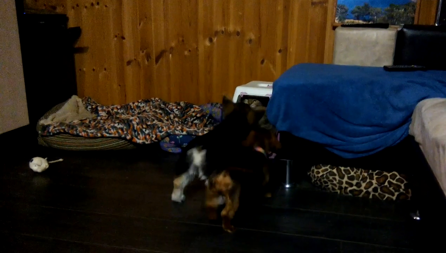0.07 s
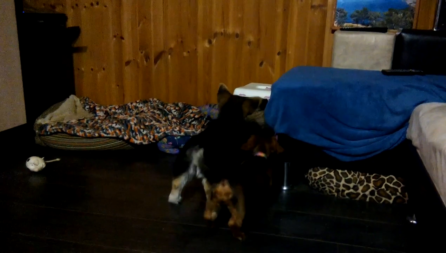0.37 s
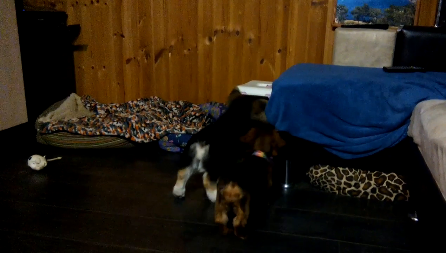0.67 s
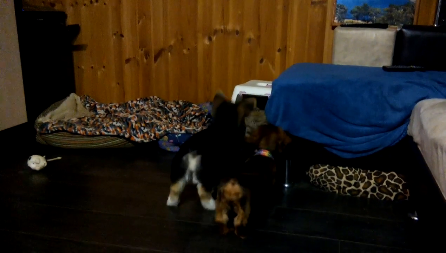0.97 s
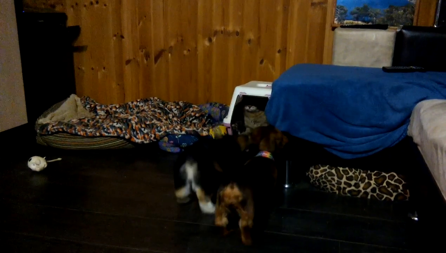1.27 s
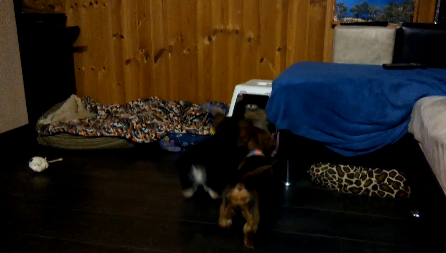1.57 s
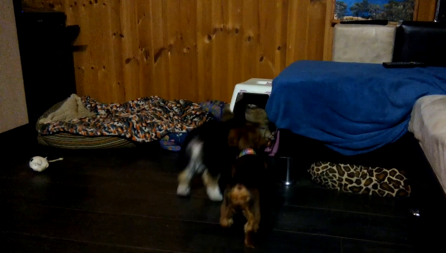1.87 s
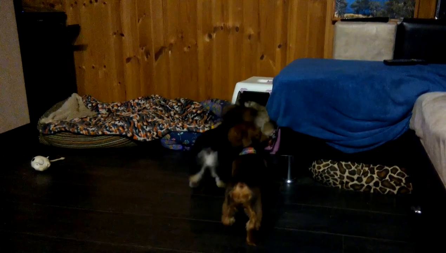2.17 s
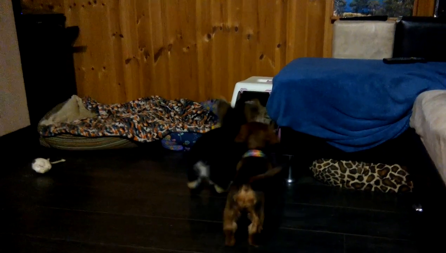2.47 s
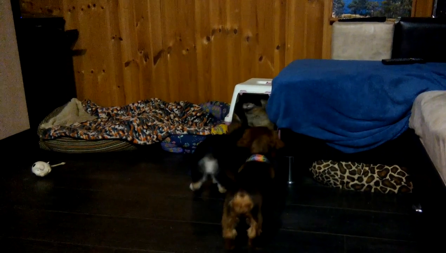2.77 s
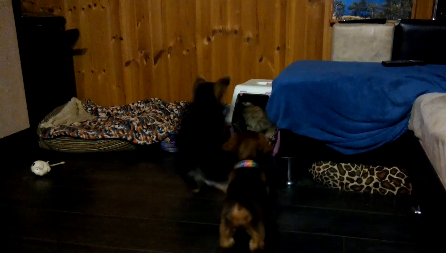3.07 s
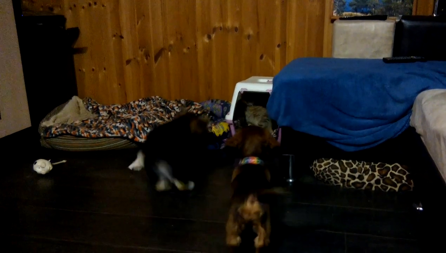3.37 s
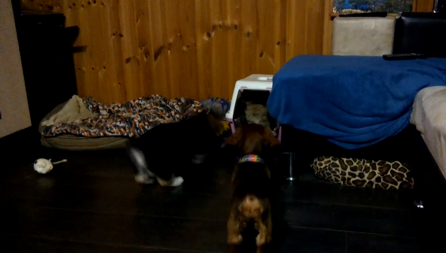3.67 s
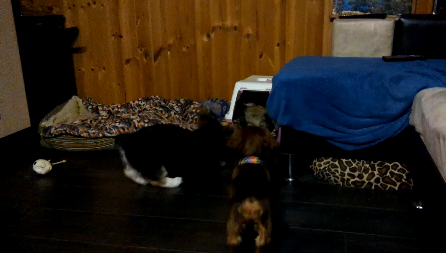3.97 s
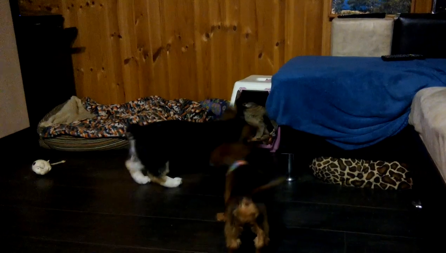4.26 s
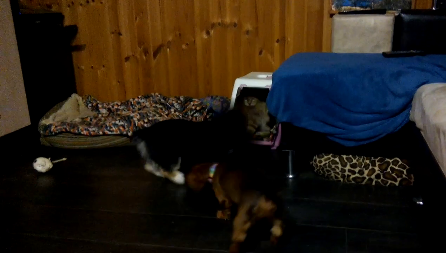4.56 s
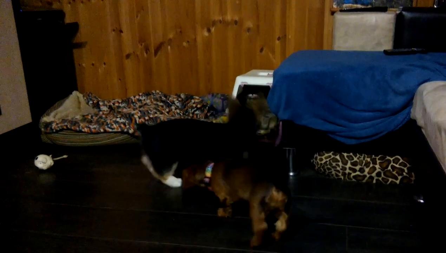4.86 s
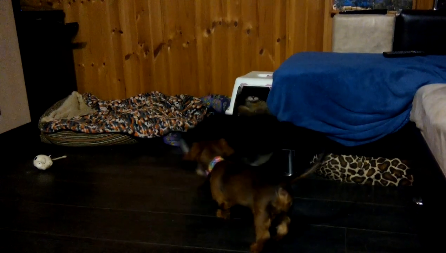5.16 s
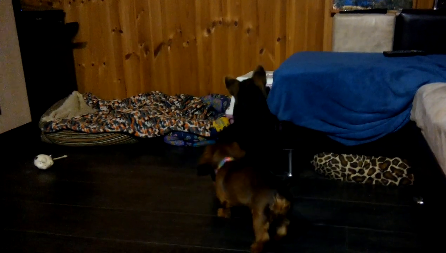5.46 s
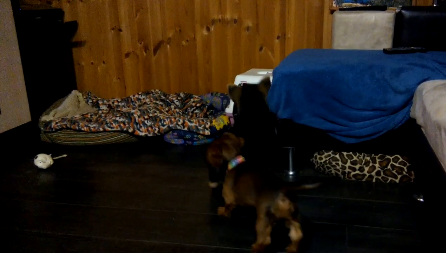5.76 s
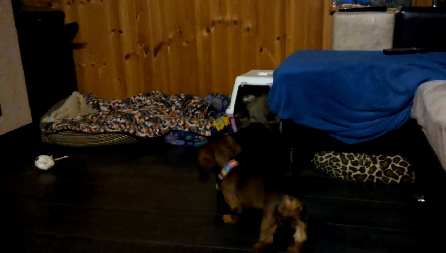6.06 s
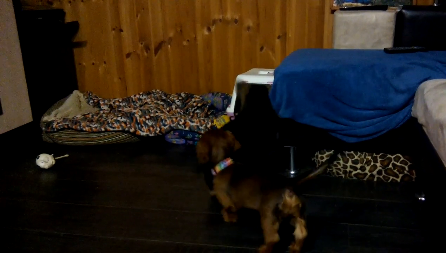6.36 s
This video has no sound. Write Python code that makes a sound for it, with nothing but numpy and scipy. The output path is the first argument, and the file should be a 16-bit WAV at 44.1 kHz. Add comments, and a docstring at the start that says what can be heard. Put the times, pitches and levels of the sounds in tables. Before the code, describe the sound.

Two small dogs scuffle on a wooden floor in a quiet, panelled room with short echoes and a faint, steady hiss and hum. For the first second and a half, there are only light, irregular claw ticks, small skids and soft paw bumps. At about 1.6 seconds one dog gives a single short, sharp, rough bark, much louder than everything else. A soft, low grunt follows at about 2.2 seconds, along with a scrape. From around 3 to 4 seconds the scuffle gets busier, with dragging paws, dull thuds on the boards, small hollow knocks and a brief high pad squeak near 3.7 seconds. Another cluster of claw clicks and thuds comes between 4.6 and 5.2 seconds. A sharper double knock with a squeak sounds at about 5.6 seconds, and a few lighter ticks and scrapes continue until about 6.5 seconds.

```python
"""One sharp, rough bark from two small dogs scuffling on a wooden floor; a soft grunt follows.
Both voices are vocal pulses and breath rasp through throat resonances. Claws tick and scrape,
pads squeak, paws thud on the boards, with short hollow knocks and soft paw bumps now and then.
The quiet, panelled room adds short echoes; faint hum and hiss lie underneath."""
import sys
import numpy as np
from scipy import signal
from scipy.fft import rfft, irfft, next_fast_len
from scipy.io import wavfile
from scipy.ndimage import uniform_filter1d, minimum_filter1d

SR = 44100
rng = np.random.default_rng(int(sys.argv[2]) if len(sys.argv) > 2 else 0)


def unload_audio(sound):
    """Save the sound as a 16-bit wav file, at the path given as the first command line argument."""
    columns = np.transpose(np.atleast_2d(sound))
    # keep every value between -1 and 1, then stretch to whole-number steps
    steps = np.round(np.clip(columns, -1, 1) * 32767)
    wavfile.write(sys.argv[1], SR, steps.astype(np.int16))


N = 286209

# bark contour (time [s], pitch [Hz], level [dB], mouth opening [0-1], roughness [0-1])
BARK_CONTOUR = [(1.554, 318.7, -42, .05, 0.5), (1.568, 287.5, -19, .33, .3), (1.585, 217.1, -13, 0.4, .3),
                (1.603, 223, -12, .62, .3), (1.622, 245.9, -12.5, .86, .4), (1.646, 261, -12.5, 1, .4),
                (1.668, 256.1, -28.5, 0.96, 0.7), (1.701, 230.6, -49, .85, .7)]
# throat modes: mouth closed, ajar, open; grunt (frequency [Hz], width [Hz], gain [dB])
CLOSED_MODES = [(313.9, 120, -5), (840, 290, 2), (2110, 400, -22)]
AJAR_MODES = [(80, 140, -25.5), (665, 190, -0.5), (870, 200, -11), (2050, 640, -14.5), (3175.5, 650, -23.5),
              (4250, 1700, -27.5)]
OPEN_MODES = [(349.7, 200, -22.5), (654, 220, -7), (787.8, 100, 1.5), (1109.9, 85, -9), (1506, 240, -2),
              (2310, 590, -13.5), (2530, 380, -9.5), (4130, 630, -6), (5580, 1100, -22.5),
              (7968.3, 1400, -25.5)]
GRUNT_MODES = [(78, 46, 5.5), (203.61, 47, -2), (371.23, 260, 1), (916.06, 270, -2)]
# overall throat colour (frequency [Hz], gain [dB])
THROAT_EQ = [(100, -5.5), (320, -0.5), (430, -9), (560, 2.5), (2700, 2.5), (3300, -3.5), (4100, 2.5),
             (4600, -6), (5200, -8), (6000, 3), (7400, -3), (10300, 2.5), (11800, -14.5), (14000, -3.5),
             (15500, -18)]
# footfalls (time [s], tick level [dB], skid level [dB])
FOOTFALLS = [(.0684, -41.5, -57), (.173, -50, -57), (.3143, -46, -54), (.7128, -39.5, -53),
             (.9928, -49, -60.5), (1.073, -41, -55), (1.423, -34, -45), (1.503, -41.5, -55),
             (1.9159, -39.5, -58), (2.022, -46, -56), (2.205, -38, -45), (3.3161, -43.5, -60.5),
             (3.4306, -27.5, -40), (3.736, -41, -47), (4.1958, -45, -59.5), (4.5606, -47, -57),
             (4.6571, -36.5, -53.5), (4.7691, -36, -44), (5.0377, -32, -41.5), (5.114, -37.5, -45.5),
             (5.364, -45.5, -59), (5.641, -37, -42.5), (6.1493, -42.5, -48.5), (6.338, -45, -54),
             (6.476, -37, -48)]
# dragged paws (time [s], length [s], level [dB])
PAW_SLIDES = [(1.01, .11, -58.5), (1.345, .08, -52), (1.8, .14, -56.5), (2.123, .062, -58),
              (2.249, .11, -42.5), (2.79, 0.18, -49.5), (3.019, .25, -52.5), (3.102, 0.18, -53),
              (3.472, .125, -44), (3.723, 0.12, -42.5), (3.82, .3, -51.5), (4.272, .078, -58.5),
              (4.69, .09, -57), (4.808, .1, -50), (5.22, .2, -61.5), (5.583, .05, -47),
              (6.209, .081, -48.5), (6.355, .09, -48)]
# pads on varnish (time [s], length [s], level [dB], pitch [Hz], width [Hz])
PAD_RUBS = [(.19, .07, -66.5, 5000, 608.6), (3.74, .05, -41.5, 4400, 904.4), (3.95, 0.3, -59, 1496, 1800),
            (4.196, .05, -57, 4200, 401.5), (4.28, .055, -61, 4221, 503.1), (5.583, .04, -43, 4200, 2500)]
# weighted landings (time [s], level [dB], boom [Hz])
LANDINGS = [(.733, -59.5, 112.6), (1.416, -51, 142.6), (2.04, -50.5, 81), (2.88, -52.5, 86),
            (3.06, -47, 185.2), (3.427, -41.5, 140.5), (3.735, -40.5, 143), (3.85, -39.5, 78),
            (4.56, -52.5, 161), (4.779, -47.5, 82.47), (4.832, -45, 127), (5.045, -44, 158.7),
            (5.119, -45, 86), (5.372, -50, 81), (5.644, -42.5, 123), (6.401, -55, 176.4)]
# short hollow knocks and soft paw bumps (time [s], level [dB], ring [Hz], length [s])
HOLLOW_KNOCKS = [(.255, -63.5, 697.7, .015), (1.33, -54, 830, .014), (2.844, -54, 640, .012),
                 (3.06, -51, 288, .02), (3.142, -58, 800, .02), (3.845, -54, 560, 0.0276),
                 (4.11, -57.5, 517, .018), (5.108, -53.5, 792, .04), (5.581, -36, 2300, .022),
                 (5.588, -46.5, 320, 0.017), (5.605, -40.5, 2295, .02), (6.152, -56.5, 446.1, 0.028)]
# claw, pad and body weight on wood (frequency [Hz], gain [dB])
CLAW_EQ = [(240, -41), (400, -17.5), (605, -10.5), (928, -12), (1000, -14.5), (1380, -19.5), (1910, -9.5),
           (2250, -11), (2430, -7.5), (2880, -9), (3740, -4), (4490, -1), (7210, -6.5), (14400, -37.5),
           (15500, -32)]
PAD_EQ = [(40, -28), (110, 9), (200, 4.5), (400, -4), (650, -2), (1000, -4.5), (1400, -14), (3000, -23.5),
          (9000, -50.5)]
THUD_EQ = [(20, -5.5), (45, -10.5), (80, 3), (170, -6.5), (260, -16.5), (500, -40), (1500, -77.5)]
# hiss spectrum (frequency [Hz], gain [dB])
HISS_EQ = [(20, -21.5), (60, -12), (100, -1), (140, -12), (185, -7), (260, -12.5), (600, -17), (2500, -22),
           (4800, -19.5), (7700, -23.5), (12000, -25), (15600, -28)]
# room decay (frequency [Hz], T60 [s])
ROOM_T60 = [(80, 0.4), (400, 0.3), (800, 0.33), (2000, .36), (4200, 0.3), (7000, .36), (14000, .26)]


def bark(jitter=.05, shimmer_db=3.5, gain_db=-2.4):
    """Uneven vocal pulses and rasp through a throat that brightens as the jaw drops."""
    times, *columns = np.transpose(BARK_CONTOUR)
    t = times[0] + clock(times[-1] - times[0])
    pitch_hz, db, mouth, rough = [np.interp(t, times, column) for column in columns]
    cycle = np.cumsum(pitch_hz / SR).astype(int)
    pitch_error, level_error = rng.standard_normal((cycle[-1] + 1, 2))[cycle].T
    phase = np.cumsum(pitch_hz * (1 + jitter * pitch_error) / SR)
    pulses = unit(np.diff(np.floor(phase), prepend=-1) * amp(shimmer_db * level_error))
    rasp = unit(rng.standard_normal(len(t)) * np.exp(-2.2 * (phase % 1)))  # one air burst per cycle
    source = amp(db + gain_db) * (np.sqrt(1 - rough) * pulses + np.sqrt(rough) * rasp)
    voice = 0
    for k, modes in enumerate([CLOSED_MODES, AJAR_MODES, OPEN_MODES]):
        crossfade = np.sin(np.pi / 2 * np.maximum(1 - np.abs(2 * mouth - k), 0))
        voice += coloured(source * crossfade, lambda f: amp(along(THROAT_EQ, f)) * formants(f, modes))
    track = np.zeros(N)
    add(track, times[0], in_room(voice, wet_db=1))
    return track


def grunt(start_s=2.218, length_s=.074, pitch_hz=118, rasp_db=4, gain_db=-39):
    """A few slow vocal pulses and rasp behind a shut mouth."""
    t = clock(length_s)
    pulses = unit(np.diff(np.floor(pitch_hz * t), prepend=0))
    swell = np.sin(np.pi * (t / t[-1]) ** 1.3) ** 2
    source = unit(swell * (pulses + amp(rasp_db) * rng.standard_normal(len(t))))
    voice = coloured(source, lambda f: formants(f, GRUNT_MODES))
    track = np.zeros(N)
    add(track, start_s, amp(gain_db) * in_room(voice, wet_db=-2))
    return track


def steps(pad_lead_s=.004, pad_db=-12.5, skid_lag_s=.002, skid_s=.048, skid_db=-1.6):
    """Each footfall: pad pats, claws tick, foot skids. Harder skids are brighter."""
    track = np.zeros(N)
    for at_s, tick_db, db in FOOTFALLS:
        tilt_db_per_oct = 3 + .41 * (db + 50)  # -50 dB: a middling skid
        add(track, at_s, amp(tick_db) * in_room(claw_tick(), wet_db=-2))
        add(track, at_s - pad_lead_s, amp(db + pad_db) * pad_pat())
        add(track, at_s + skid_lag_s, amp(db + skid_db) * claw_scrape(skid_s, tilt_db_per_oct))
    return track


def claw_tick(centre_hz=5000, spread_oct=.19, width_hz=1000, attack_s=.0003, t60_s=.016, second_db=-2):
    """A claw strikes wood and rings briefly; its neighbour lands just after."""
    t = clock(.03)
    ring_hz = centre_hz * 2 ** (spread_oct * rng.standard_normal())
    lag_s = rng.uniform(.0014, .0044)
    touch = lambda age_s: (1 - np.exp(-age_s / attack_s)) * amp(-60 * age_s / t60_s)
    envelope = touch(t) + amp(second_db) * touch(np.maximum(t - lag_s, 0))
    contact = envelope * rng.standard_normal(len(t))
    return coloured(contact, lambda f: amp(along(CLAW_EQ, f)) * (.24 + resonance(f, ring_hz, width_hz)))


def claw_scrape(length_s, tilt_db_per_oct):
    """Claws drag over the grain; sharper slips sound brighter."""
    gain = lambda f: amp(along(CLAW_EQ, f) + tilt_db_per_oct * np.log2(np.maximum(f, 1500) / 5000))
    slips = stroke(length_s, grain_db=4.5, skew=.7)
    return in_room(coloured(slips, gain), wet_db=-.5)


def pad_pat():
    """A soft pad meets wood."""
    contact = stroke(.021, grain_db=4, skew=.98)
    return in_room(coloured(contact, lambda f: amp(along(PAD_EQ, f))), wet_db=.5)


def slides(gain_db=-2):
    """Shoving dogs drag their feet: longer, duller scrapes."""
    track = np.zeros(N)
    for at_s, length_s, db in PAW_SLIDES:
        add(track, at_s, amp(db + gain_db) * claw_scrape(length_s, tilt_db_per_oct=.52))
    return track


def pad_squeaks(gain_db=-2):
    """Pads stick and slip on varnish: band-limited noise."""
    track = np.zeros(N)
    for at_s, length_s, db, hz, width_hz in PAD_RUBS:
        slips = stroke(length_s, grain_db=1, skew=.93)
        squeak = coloured(slips, lambda f: resonance(f, hz, width_hz) ** 2)
        add(track, at_s, amp(db + gain_db) * in_room(squeak, wet_db=-1))
    return track


def paw_thuds(boom_s=.19, boom_db=-5.5, joist_hz=82, joist_db=-5, thud_db=-11):
    """A landing paw slaps and thuds; the floor booms at the impact and on its joists."""
    track, t = np.zeros(N), clock(boom_s)
    swell = np.sin(np.pi * (t / t[-1]) ** .52) ** 2
    for at_s, db, hz in LANDINGS:
        boom = swell * (np.sin(2 * np.pi * hz * t) + amp(joist_db) * np.cos(2 * np.pi * joist_hz * t))
        thud = coloured(stroke(.073, grain_db=1, skew=.6), lambda f: amp(along(THUD_EQ, f)))
        slap_db = -16 + 4.5 * np.log2(hz / joist_hz)  # quick landings boom higher, slap more
        add(track, at_s, amp(db + boom_db) * boom)
        add(track, at_s, amp(db + thud_db) * in_room(thud, wet_db=-3.5))
        add(track, at_s, amp(db + slap_db) * pad_pat())
    return track


def knocks(damping=.52, gain_db=-2):
    """Hollow knocks and soft paw bumps: brief contact noise through one broad resonance."""
    track = np.zeros(N)
    for at_s, db, hz, length_s in HOLLOW_KNOCKS:
        contact = stroke(length_s, grain_db=1.5, skew=.79)
        knock = coloured(contact, lambda f: resonance(f, hz, damping * hz) ** 2)
        add(track, at_s, amp(db + gain_db) * in_room(knock, wet_db=-2.5))
    return track


def stray_claws(rate_per_s=4, softest_db=-56.5, range_db=6):
    """Light random claw touches as the dogs shift weight."""
    track, count = np.zeros(N), round(rate_per_s * N / SR)
    for when, force in rng.random((count, 2)):
        add(track, when * N / SR, amp(softest_db + range_db * force) * in_room(claw_tick(), wet_db=-1))
    return track


def background(hiss_db=-65, hum_db=-78, hum_hz=101.08, drift_hz=1.5, drift_rad=.4):
    """Even hiss and a faint, wavering electrical hum."""
    hiss = unit(coloured(rng.standard_normal(N), lambda f: amp(along(HISS_EQ, f)))[:N])
    drift = unit(coloured(rng.standard_normal(N), lambda f: 1 / (1 + (f / drift_hz) ** 4))[:N])
    hum = unit(np.sin(2 * np.pi * hum_hz * np.arange(N) / SR + drift_rad * drift))
    return amp(hiss_db) * hiss + amp(hum_db) * hum


def in_room(x, wet_db, build_s=.0043, sparse_s=.018):
    """Direct sound plus sparse wall echoes that thicken into a tail."""
    t = clock(.5)
    echoes = rng.standard_normal(len(t)) * amp(7 * np.exp(-t / sparse_s) * rng.standard_normal(len(t)))
    echoes /= np.sqrt(np.abs(uniform_filter1d(echoes ** 2, size=400)))
    hz, age_s, bands = signal.stft(echoes, SR, nperseg=256)
    decay = amp(-60 * age_s / along(ROOM_T60, hz)[:, None])
    tail = signal.istft(bands * decay, SR, nperseg=256)[1][:len(t)]
    tail *= 1 - np.exp(-(t / build_s) ** 2)
    response = amp(wet_db) * tail / np.linalg.norm(tail)
    response[0] += 1
    return signal.fftconvolve(x, response)


def stroke(length_s, grain_db, skew):
    """Contact noise of tiny uneven slips; swells and fades."""
    t = clock(length_s)
    slip_db = grain_db * np.clip(rng.standard_normal(len(t) // 32 + 1), -2, 2)
    slips = amp(slip_db).repeat(32)[:len(t)]
    swell = np.abs(np.sin(np.pi * (t / t[-1]) ** skew))
    return unit(swell * slips * rng.standard_normal(len(t)))


def coloured(x, gain):
    """Minimum-phase filter with curve gain(Hz); energy preserved."""
    size = 2 * next_fast_len(len(x) + SR // 10)
    cepstrum = irfft(np.log(np.maximum(gain(np.fft.rfftfreq(size, 1 / SR)), 1e-6)))
    cepstrum[1:size // 2] *= 2
    cepstrum[size // 2 + 1:] = 0
    y = irfft(rfft(x, size) * np.exp(rfft(cepstrum)))[:len(x) + SR // 20]
    return y * np.linalg.norm(x) / np.linalg.norm(y)


def formants(f, modes):
    """Summed gain of throat modes."""
    return sum(amp(db) * resonance(f, hz, width_hz) ** 2 for hz, width_hz, db in modes)


def resonance(f, hz, width_hz):
    """Gain of one resonance."""
    return f * width_hz / np.hypot(hz * hz - f * f, f * width_hz)


def along(points, hz):
    """Interpolate (Hz, value) points over log frequency."""
    knots_hz, values = np.transpose(points)
    return np.interp(np.log(hz + 1), np.log(knots_hz + 1), values)


def amp(db):
    """dB to gain."""
    return 10 ** (np.asarray(db) / 20)


def unit(x):
    """Scale to rms 1."""
    return x / np.sqrt(np.mean(x ** 2) + 1e-20)


def clock(length_s):
    """Sample times [s]."""
    return np.arange(max(int(length_s * SR), 2)) / SR


def add(track, at_s, x):
    """Mix x into track."""
    start = min(max(round(at_s * SR), 0), N)
    track[start:start + len(x)] += x[:N - start]


def suppressed(x, depth_db=7, threshold_db=9, knee_db=7.5):
    """Noise suppressor: cuts each band while near its own floor."""
    bands = signal.stft(x, nperseg=512)[2]
    power = uniform_filter1d(np.abs(bands) ** 2, size=7, axis=-2)
    power = np.abs(uniform_filter1d(power, size=3, axis=-1)) + 1e-20
    above_db = 10 * np.log10(power / np.quantile(power, .2, axis=-1, keepdims=True))
    cut_db = depth_db * (1 - np.tanh((above_db - threshold_db) / (2 * knee_db))) / 2
    return signal.istft(bands * amp(-cut_db), nperseg=512)[1][..., :N]


def limited(x, ceiling=.95):
    """Limiter: gain dips smoothly round peaks above the ceiling."""
    gain = np.minimum(ceiling / (np.abs(x) + 1e-9), 1)
    return x * uniform_filter1d(minimum_filter1d(gain, size=301), size=151)


def scene():
    """Mono mix."""
    voices = bark() + grunt()
    scuffle = steps() + slides() + pad_squeaks() + paw_thuds() + knocks()
    return (voices + scuffle + background() + stray_claws())[None]


def record(dry, cutoff_hz=15720):
    """Noise suppressor, limiter, brick-wall low-pass."""
    held = limited(suppressed(dry))
    size = next_fast_len(N + SR // 2)
    passband = np.fft.rfftfreq(size, 1 / SR) < cutoff_hz
    return irfft(rfft(held, size) * passband, size)[..., :N]


dry = scene()
out = record(dry)
unload_audio(out)
```